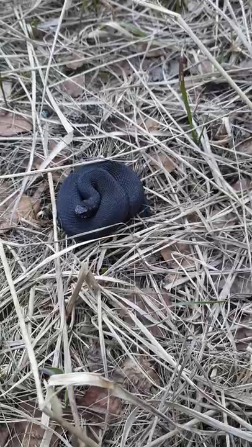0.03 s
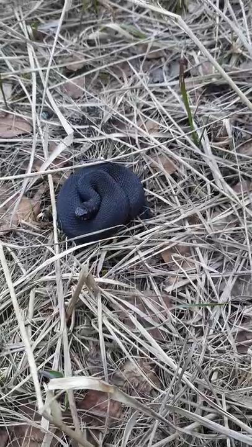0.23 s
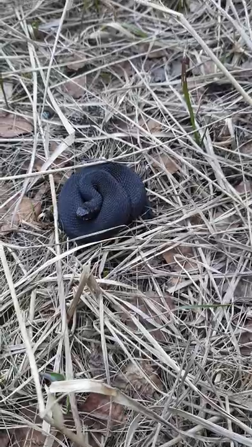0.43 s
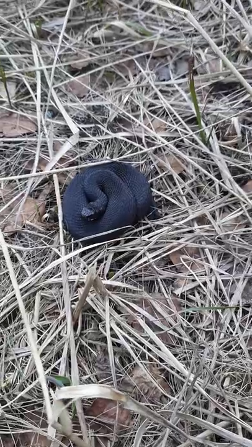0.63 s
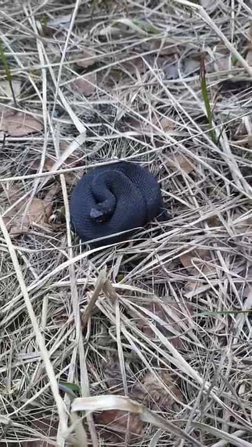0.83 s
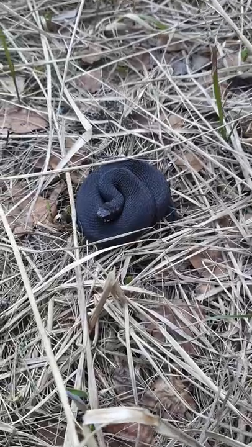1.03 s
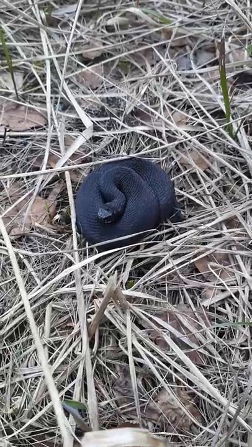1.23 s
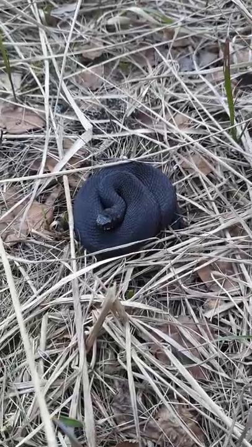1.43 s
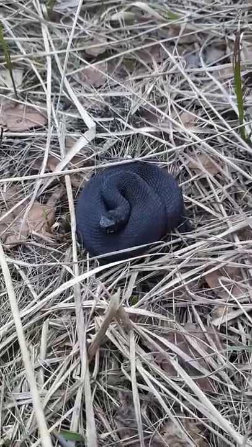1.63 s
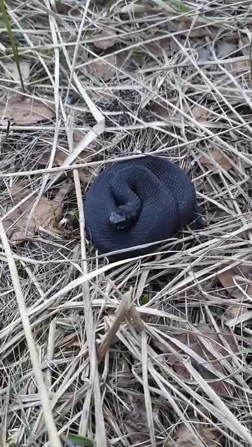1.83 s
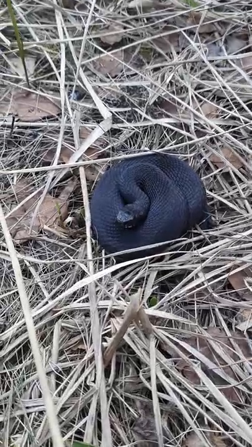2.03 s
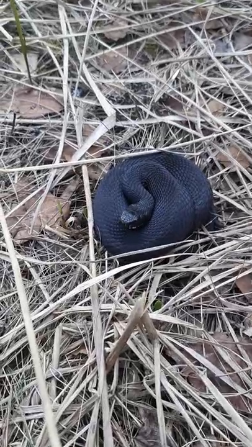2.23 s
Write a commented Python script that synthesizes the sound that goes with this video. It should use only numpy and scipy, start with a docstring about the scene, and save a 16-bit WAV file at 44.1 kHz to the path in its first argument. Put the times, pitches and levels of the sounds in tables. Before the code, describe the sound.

A snake hisses close by in dry grass while light wind buffets the microphone.

```python
"""In dry forest grass, close by and to the right, a coiled snake hisses by pushing air through its throat:
a long soft hiss as it breathes in, a sharp one as it blows out, then a soft breath in again.
Dry stalks tick as their fibres crack, and a small bird chirps four times far off among the trees.
Light wind thumps on the two microphone openings (the ports), over the faint hush of the forest."""
import sys
import numpy as np
from scipy import signal
from scipy.fft import rfft, irfft
from scipy.io import wavfile
from scipy.ndimage import uniform_filter1d

SR = 44100
rng = np.random.default_rng(int(sys.argv[2]) if len(sys.argv) > 2 else 0)


def transcribe(u):
    """Save the signal u as a 16-bit wav file named by the first command-line argument.

    u: samples, shape (n,) or (channels, n), limited to [-1, 1]; the rate is SR.
    q: integer samples, one column per channel.
    """
    v = np.clip(np.atleast_2d(u).T, -1, 1)
    q = np.round(v * 32767).astype(np.int16)
    wavfile.write(sys.argv[1], SR, q)


N = 101429
T = np.arange(N) / SR

# the two breaths in: t/s, air level/dB, throat level/dB
FIRST_BREATH = [(.42, -94, -105), (.5, -73.5, -89.5), (.66, -71, -91), (.72, -66, -76), (.78, -61, -73),
                (.95, -58.5, -68), (1.11, -57, -63), (1.17, -59, -66.5), (1.29, -60.5, -71.5),
                (1.39, -58.5, -65.5), (1.45, -83, -88)]
SECOND_BREATH = [(1.68, -67, -85), (1.75, -61, -65), (1.81, -65.5, -84), (1.89, -68, -85.5),
                 (1.95, -62.5, -73.5), (2.01, -65, -73.5), (2.08, -67, -89), (2.2, -67, -91),
                 (2.3, -71, -84)]
# the blow out: t/s, air level/dB, throat level/dB, extra gain on the left/dB
BLOW_OUT = [(1.365, -97, -95.5, 0), (1.39, -52, -71, -5), (1.45, -45, -58.5, -3), (1.495, -43, -50, 1),
            (1.54, -45.5, -51, -3.5), (1.59, -47, -50, -4), (1.66, -52, -60.5, -2), (1.73, -63, -64.5, -12),
            (1.8, -88, -100, -15)]
# tone colour (how strong each pitch is) of air going in and out: f/Hz, level/dB
BREATH_COLOUR = [(400, -12), (1000, -8), (1500, -9), (2500, -6.5), (3600, -11), (4700, 0.5), (5700, -2.5),
                 (6600, 0), (8500, 2), (9400, -8), (10200, -10.5), (11300, -1.5), (12600, -1.5),
                 (14200, -6), (15700, -15)]
BLOW_COLOUR = [(400, -8), (900, -8.5), (1500, -2), (2600, 1.5), (3700, -3.5), (4500, 2), (5400, 3),
               (6300, 3.5), (8000, 6), (8750, 7), (9400, -10), (10200, -4), (11500, 1), (13000, 0.5),
               (15600, -6.5)]
# pitches at which the throat rings: f/Hz, rough width/Hz, relative level/dB
BREATH_RINGS = [(2120, 470, 18), (2580, 680, -20.5)]
BLOW_RINGS = [(2010, 400, 0), (2640, 440, 0)]
# the left port faces away from the snake and hears less: f/Hz, gain/dB
LEFT_SHADOW = [(800, -6), (2000, -14), (2700, -9), (3600, -7.5), (4700, -12), (6000, -13.5), (7600, -10),
               (8700, -23.5), (9700, -12.5), (11500, -14), (13000, -21), (15500, -23.5)]
# ticking stalks: t/s, level/dB, ring f/Hz, fade time/s, ring compared with crack/dB
STALK_TICKS = [(0.4682, -61.5, 8400, 0.0076, 1.5), (1.0905, -60, 7600, 0.0013, 3),
               (1.1113, -41, 7300, 0.00067, 9), (1.3486, -46, 12500, .001, -13),
               (1.4965, -37, 8700, 0.00099, 5), (1.7076, -48, 6770, 0.0012, 13.5),
               (1.7121, -41.5, 7800, 0.0018, 11), (1.7213, -53, 2000, .004, 4),
               (1.73, -42, 7250, 0.0015, -1.5), (1.735, -42.5, 7760, 0.0016, -18),
               (1.8665, -69, 2000, .0015, -3), (1.9015, -71, 700, .004, 14.5),
               (1.9427, -60.5, 6760, 0.002, 7.5), (2.0027, -63, 4570, 0.0011, 8),
               (2.0748, -54, 7340, 0.00075, 10.5), (2.135, -62, 12900, 0.0016, 13),
               (2.175, -60, 12400, 0.0013, 12), (2.19, -63.5, 6460, .0018, 13),
               (2.2637, -62, 3560, 0.0011, 6)]
# tone colour of a cracking fibre: f/Hz, level/dB
FIBRE_COLOUR = [(500, -8.5), (2000, -0.5), (3600, -7.5), (6500, -8), (8600, -2), (9300, -16), (10400, -22),
                (12000, 3.5), (15500, -7)]
# faint crackling of the grass: t/s, level/dB
GRASS_CRACKLE = [(0, -79), (.65, -87.5), (1.1, -68), (1.8, -67), (2.1, -73), (2.3, -68)]
# each chirp's falling note: t/s, level/dB, length/s
BIRD_CHIRPS = [(.158, -80.5, .026), (0.343, -77.5, 0.037), (0.533, -76.5, 0.047), (0.727, -72, 0.026)]
# gusts on each port: t/s, half width/s, level/dB, brightness/dB
GUSTS_LEFT = [(0.055, 0.004, -24.5, -23.5), (0.164, 0.028, -34, -31), (0.235, 0.0073, -26.5, 6),
              (0.305, 0.0048, -21.5, -9.5), (0.338, 0.0045, -25, -20), (0.43, 0.0058, -22, -7),
              (0.542, 0.016, -28.5, -6), (.597, 0.0091, -28.5, -28), (0.69, 0.013, -32, -17),
              (0.746, 0.006, -23.5, 4), (0.797, 0.036, -26.5, -6), (0.925, 0.011, -21, -6.5),
              (0.954, 0.0058, -17.5, 5), (0.98, 0.017, -23.5, -18), (1.098, 0.012, -29.5, 13.5),
              (1.178, .014, -20.5, 3.5), (1.224, 0.018, -24.5, 7), (1.339, 0.015, -25, 10.5),
              (1.377, 0.0056, -18.5, -4), (1.49, .027, -17, 2.5), (1.558, 0.025, -25.5, 7.5),
              (1.673, 0.011, -22, -4), (1.773, 0.007, -16, -1), (1.81, 0.017, -15.5, -4.5),
              (2.036, 0.0067, -28.5, -25), (2.124, 0.048, -38, 0.5), (2.233, .013, -34.5, -9)]
GUSTS_RIGHT = [(0.811, .01, -23, -2), (.86, .04, -37.5, 3.5), (1.151, 0.012, -30, -3),
               (1.328, 0.043, -38, -10), (1.53, 0.0093, -38.5, -12.5), (1.623, 0.0078, -23.5, -4),
               (1.667, .013, -21, -5.5), (1.714, 0.0065, -20, -5), (1.78, 0.0083, -28.5, -8),
               (1.853, 0.0063, -39.5, -3), (2.039, 0.0081, -38, 5), (2.214, 0.008, -40.5, 6.5)]
# the breeze between gusts: t/s, left level/dB, right level/dB
BREEZE_LEVELS = [(0, -40, -55), (.3, -39.5, -56.5), (0.578, -37, -61), (0.644, -62, -57.5),
                 (0.699, -38, -51), (.9, -35, -42), (1.3, -30.5, -49), (1.72, -32, -36), (1.9, -41, -46),
                 (2.3, -51.5, -53)]
# tone colour of the wind's deep rumble and its brighter thumps: f/Hz, level/dB
DEEP_COLOUR = [(20, -26), (35, -3.5), (52, 2.5), (70, 7.5), (115, 5.5), (170, -7), (250, -22), (400, -46),
               (700, -70.5), (1500, -84.5)]
THUMP_COLOUR = [(60, -34.5), (130, -1), (230, 3.5), (330, -11), (480, -26), (700, -43.5), (1400, -70.5)]
# single swirls of air slapping the left port: t/s, half width/s, peak level/dB
WIND_SLAPS = [(0.7356, 0.0012, -19), (0.957, 0.00098, -15.5), (1.2343, 0.00087, -22.5),
              (1.3396, 0.0013, -12)]
# tone colour of still forest air: f/Hz, level/dB
HUSH_COLOUR = [(100, 0.5), (500, 14), (1000, 7), (2000, 4), (2900, 2.5), (3700, 4.5), (4500, 0.5),
               (6500, -3), (8000, 9), (10000, -0.5), (13000, 4.5), (15500, -4)]


def snake():
    """Two soft breaths in with a hard blow between them, each made of rushing air and a ringing throat."""
    second_breath = from_db(in_time(SECOND_BREATH)) * (T > SECOND_BREATH[0][0])
    air, hollow = from_db(in_time(FIRST_BREATH)) + second_breath
    breaths = air * rushing_air(BREATH_COLOUR) + hollow * throat(BREATH_RINGS)
    air_db, throat_db, left_db = in_time(BLOW_OUT)
    blow = from_db(air_db) * rushing_air(BLOW_COLOUR) + from_db(throat_db) * throat(BLOW_RINGS)
    blow[0] *= from_db(left_db)
    return breaths + blow * (T > BLOW_OUT[0][0])


def rushing_air(colour, flutter_db=1.17, flutter_below_hz=60):
    """Air swirls through the opening of the snake's windpipe, making a hiss that flutters slightly."""
    smoothing = signal.butter(2, flutter_below_hz, fs=SR, output="sos")
    flutter = rms_one(signal.sosfilt(smoothing, rng.standard_normal(N)))
    return at_ports(noise(colour), likeness=.18) * from_db(flutter_db * flutter)


def throat(pitches):
    """Swirling air rings in the snake's airway, which makes the hiss sound hollow."""
    rings = sum(from_db(db) * ring(rng.standard_normal((2, N)), hz, 2 * width) for hz, width, db in pitches)
    return at_ports(rms_one(rings), likeness=.6)


def stalks(snaps_per_s=60, spread_db=3, snap_fade_s=.0012):
    """Each tick is a dry fibre cracking and ringing briefly; fainter snaps come at random."""
    crack, fibres = noise(FIBRE_COLOUR), noise(FIBRE_COLOUR)
    ticks = np.zeros((2, N))
    for start, db, hz, fade_s, ring_db in STALK_TICKS:
        burst = (T >= start) * np.exp(-np.abs(T - start) / fade_s)
        ticks += from_db(db) * burst * (crack + from_db(ring_db) * ring(fibres, hz, hz / 2.6))
    snaps = rng.random(N) < snaps_per_s / SR
    snap_db = in_time(GRASS_CRACKLE)[0] + spread_db * np.minimum(rng.exponential(1, N), 2)
    fade_step = np.exp(-1 / (snap_fade_s * SR))
    crackle = signal.lfilter([1], [1, -fade_step], snaps * from_db(snap_db) + 1e-18)
    return at_ports(ticks + crack * crackle, likeness=.36)


def bird(rise_db=-8, echo_db=-6, echo_fade_s=.07):
    """Each far chirp is a small rising note, then a falling one; the trees add a short echo."""
    song = np.zeros(N)
    for start, db, length in BIRD_CHIRPS:
        fall = whistle(start, length, from_hz=3935, to_hz=3010)
        rise = whistle(start - .046, length_s=.024, from_hz=3154, to_hz=3670)
        song += from_db(db) * (fall + from_db(rise_db) * rise)
    trees = rng.standard_normal((2, N)) * np.exp(-T / echo_fade_s)
    trees /= np.sqrt(np.sum(trees[0] ** 2))
    echoes = signal.fftconvolve(song[None], trees, axes=1)[:, :N]
    return song + from_db(echo_db) * echoes


def whistle(start, length_s, from_hz, to_hz, bend=1.3, waver_hz=52.6):
    """One slightly unsteady note that slides in pitch, swelling and fading once."""
    progress = np.clip((T - start) / length_s, 0, 1)
    waver = waver_hz * rms_one(uniform_filter1d(rng.standard_normal(N), size=100))
    hz = from_hz + (to_hz - from_hz) * progress ** bend + waver
    return np.sin(np.pi * progress) * np.sin(2 * np.pi * np.cumsum(hz) / SR)


def wind(low_cut_hz=42.1):
    """Swirls of air thump on each port separately; the stronger ones reach higher in pitch."""
    left_db, right_db = in_time(BREEZE_LEVELS)
    rumble, thumps = np.stack([wind_force(left_db, GUSTS_LEFT), wind_force(right_db, GUSTS_RIGHT)], axis=1)
    swirls = rumble * steady_noise(DEEP_COLOUR, samples=900)
    swirls += thumps * steady_noise(THUMP_COLOUR, samples=500)
    swirls[0] += slaps()
    return signal.sosfilt(signal.butter(4, low_cut_hz, "high", fs=SR, output="sos"), swirls)


def wind_force(breeze_db, gusts, reference_db=-18.5, thump_db=-9.5, growth=1.516):
    """Strength of the rumble and the thumps on one port; thumps grow faster as the wind gets stronger."""
    bumps = [from_db(db) * np.exp(-.5 * ((T - t) / width) ** 2) for t, width, db, _ in gusts]
    swells = np.array([from_db(breeze_db)] + bumps)
    brightness = from_db([0] + [gust[3] for gust in gusts])[:, None]
    thumps = brightness * from_db(reference_db + thump_db) * (swells / from_db(reference_db)) ** growth
    return np.linalg.norm(swells, axis=0), np.linalg.norm(thumps, axis=0)


def slaps():
    """A lone swirl sucks at the port and then pushes: one swing of pressure."""
    return sum(from_db(db) * (T - t) / width * np.exp(.5 - .5 * ((T - t) / width) ** 2)
               for t, width, db in WIND_SLAPS)


def forest_hush(level_db=-77):
    """The faint, even sound of still forest air."""
    return from_db(level_db) * noise(HUSH_COLOUR)


def at_ports(pair, likeness, delay_s=.0003):
    """Sound from the snake's spot reaches the left port weaker, later and partly scattered by grass."""
    scattered, right = pair
    left = likeness * np.roll(right, int(delay_s * SR)) + np.sqrt(1 - likeness ** 2) * scattered
    return np.array([coloured(left, LEFT_SHADOW), right])


def ring(x, hz, filter_width_hz):
    """Make noise ring around one pitch by passing it twice through the same filter."""
    r = np.exp(-np.pi * filter_width_hz / SR)
    feedback = [1, -2 * r * np.cos(2 * np.pi * hz / SR), r * r]
    for _ in range(2):
        x = signal.lfilter(np.array([1, 0, -1]) * (1 - r * r) / 2, feedback, x + 1e-18)
    return rms_one(x)


def steady_noise(colour, samples):
    """Noise with its slow swings evened out, so that the wind's strength alone sets the level."""
    x = noise(colour)
    power = uniform_filter1d(np.abs(signal.hilbert(x)) ** 2, samples, axis=-1)
    return rms_one(x / np.sqrt(power + 1e-9))


def noise(colour):
    """Separate left and right noise with the given tone colour."""
    return rms_one(coloured(rng.standard_normal((2, N)), colour))


def coloured(x, colour):
    """Turn each pitch up or down along a smooth curve."""
    hz, db = np.transpose(colour)
    f = np.maximum(np.fft.rfftfreq(N, 1 / SR), 1)
    gain = from_db(np.interp(np.log(f), np.log(hz), db))
    return irfft(rfft(x) * gain, N)


def in_time(rows):
    """Join a table's points with straight lines, giving one curve per column."""
    times, *columns = np.transpose(rows)
    return [np.interp(T, times, column) for column in columns]


def rms_one(x):
    """Scale a signal so that its average strength (rms) is 1."""
    return x / np.sqrt(np.mean(x ** 2) + 1e-20)


def from_db(db):
    """Turn decibels into a number to multiply by."""
    return 10 ** (np.asarray(db) / 20)


def scene():
    """Snake, stalks, bird and wind over the quiet of the forest."""
    return snake() + stalks() + bird() + wind() + forest_hush()


def record(dry, fade_in_s=.015, high_cut_hz=15800):
    """The sound eases in, and the very highest pitches are cut away."""
    high_cut = signal.ellip(12, .1, 80, high_cut_hz, fs=SR, output="sos")
    return signal.sosfilt(high_cut, dry * np.minimum(T / fade_in_s, 1))


dry = scene()
out = record(dry)
transcribe(out)
```